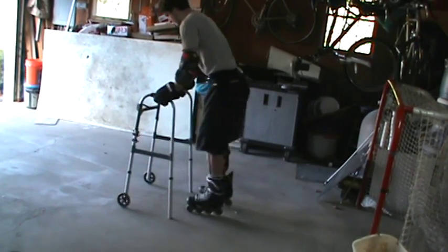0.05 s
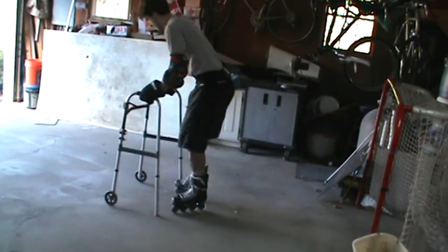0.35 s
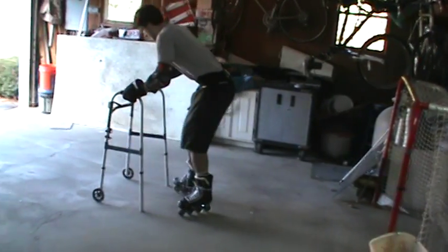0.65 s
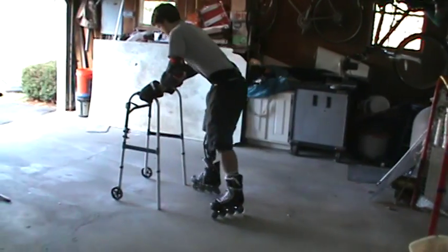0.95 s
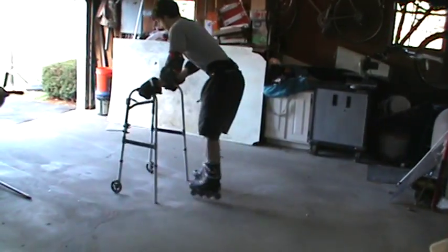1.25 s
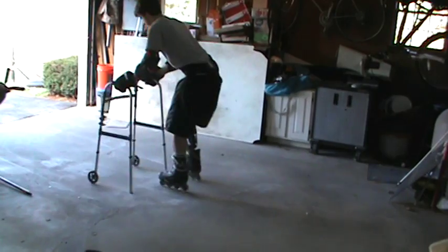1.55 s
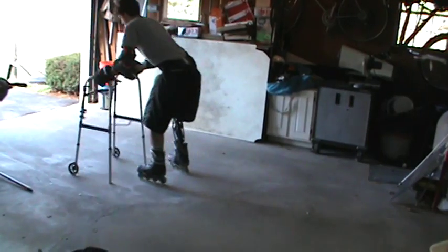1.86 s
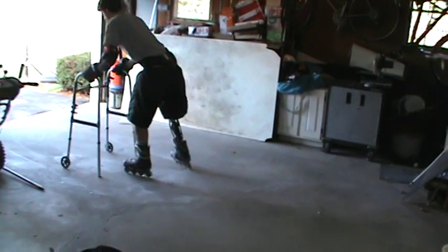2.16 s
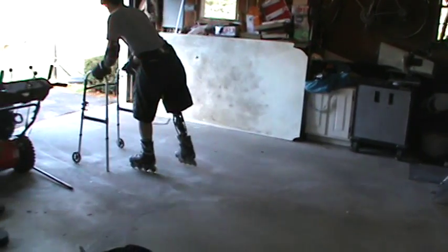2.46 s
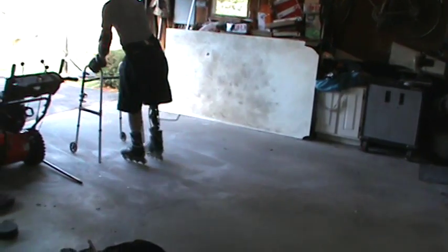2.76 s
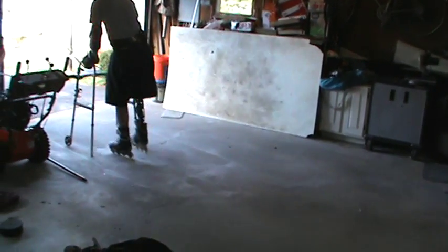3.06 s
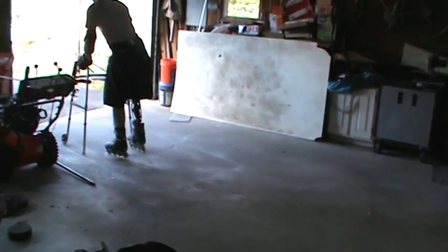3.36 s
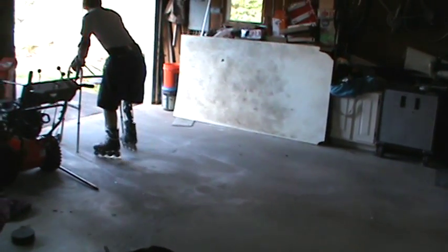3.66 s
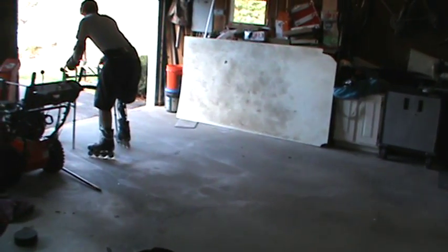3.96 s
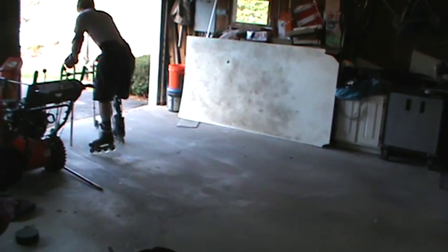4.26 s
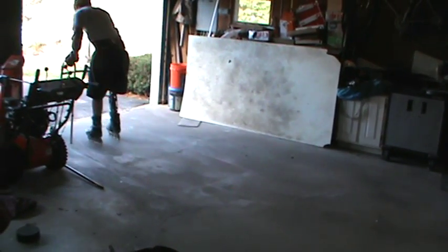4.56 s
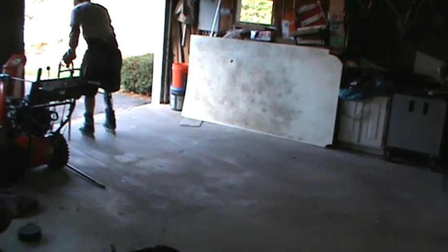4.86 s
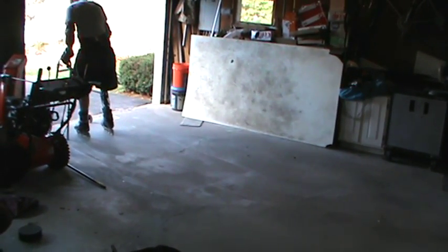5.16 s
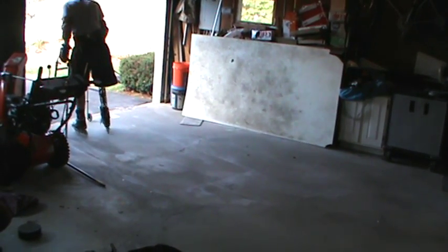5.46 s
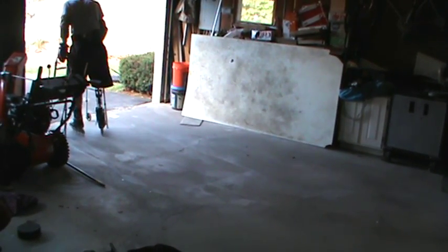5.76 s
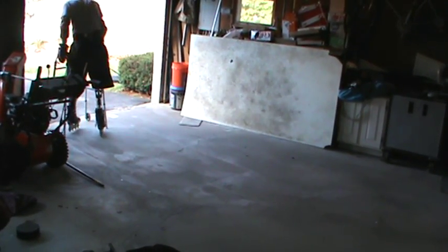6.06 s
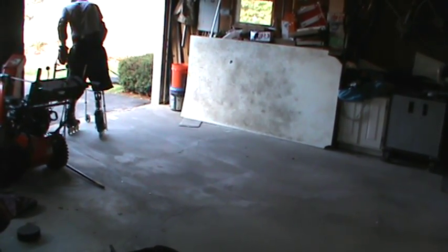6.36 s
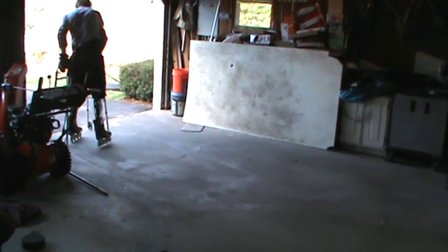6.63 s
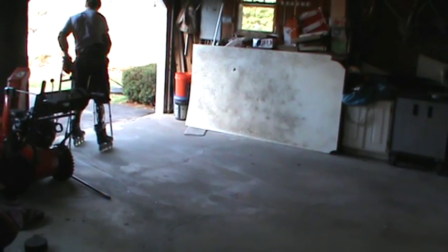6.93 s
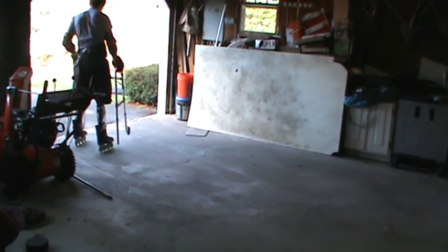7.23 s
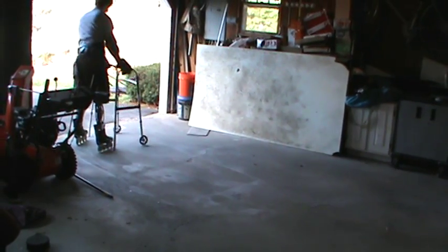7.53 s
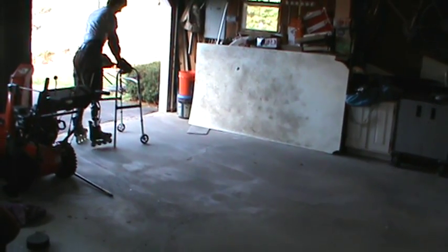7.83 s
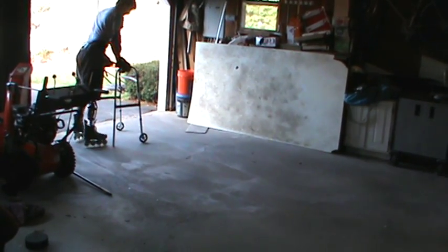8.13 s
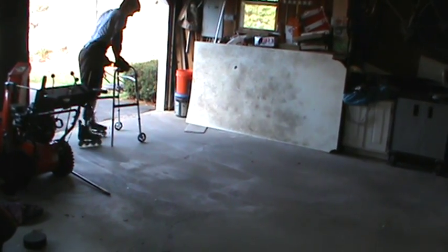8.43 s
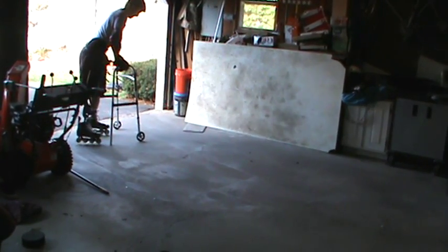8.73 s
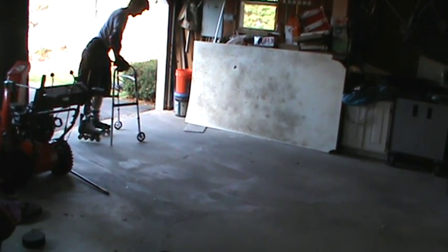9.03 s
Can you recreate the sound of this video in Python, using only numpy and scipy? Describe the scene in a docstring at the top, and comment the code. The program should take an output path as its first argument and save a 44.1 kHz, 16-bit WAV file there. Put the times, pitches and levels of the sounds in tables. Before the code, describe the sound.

An aluminium walker scrapes, squeals and clatters over a concrete garage floor while inline skates rumble and thud softly.

```python
"""First you hear an aluminium walker grinding and squealing over a concrete garage floor.
Someone on inline skates pushes it: its bare rear legs hop, stick and slip, ringing the tubes,
while its loose joints rattle and the skate wheels rumble and thud. The rolling stops at the open
door, where the walker is set down with a clatter. The garage echoes over faint outdoor air and hum."""
import sys
import numpy as np
from scipy import signal
from scipy.fft import rfft, irfft, next_fast_len
from scipy.io import wavfile
from scipy.ndimage import uniform_filter1d

SR = 44100
rng = np.random.default_rng(int(sys.argv[2]) if len(sys.argv) > 2 else 0)


def bounce(signal):
    """Save signal as a 16-bit WAV file at the path given by the first command-line argument."""
    frames = np.transpose(np.atleast_2d(signal))
    limited = np.clip(frames, -1, 1)
    pcm = np.round(limited * 32767).astype(np.int16)
    wavfile.write(sys.argv[1], SR, pcm)


N = 409688
TIME = np.arange(N) / SR
HIGHEST_HZ = 16000

# One loudness curve for each push of the walker: time_s, level_db, extra_low_ring_db
PUSHES = [
    [(0, -24.5, -1.5), (.1, -31, 1.5), (.25, -37.5, 0)],
    [(.3, -22.5, -4.5), (.39, -31, 2.5), (.52, -24, -2), (.64, -30, 0.5), (.79, -25.5, -2),
     (1.02, -30.5, -3), (1.28, -24.5, -3.5), (1.55, -28, -2.5), (2.14, -35, -3)],
    [(2.17, -26.5, 1), (2.45, -27.5, -1), (2.66, -25.5, -3.5), (2.8, -31, 1), (3.0, -27.5, -3.5),
     (3.2, -25, -4), (3.55, -23, -2), (3.86, -28, -1.5), (4.0, -32.5, -5.5)],
    [(4.03, -27.5, -6), (4.18, -31, -3.5), (4.33, -28, -2), (4.58, -33, -2), (4.81, -23, -2),
     (4.95, -31.5, -1.5), (5.21, -39, 8), (5.35, -52, -5)],
    [(5.4, -37, -4), (5.55, -34.5, -0.5), (5.73, -50, 2)],
]
# The tone of metal dragged on concrete: frequency_hz, gain_db
GRIND_TONE = [(100, -32), (300, -6), (520, -2.5), (950, -2), (1600, .5), (2400, -2.5), (3100, -4),
              (4500, -.5), (8000, -1.5), (11000, -1.5), (13000, -5), (16000, -12.5)]
def grinding_legs(gain_db=0.5, hops_per_s=110, dulling_db_per_s=0.5, treble_ceiling_db=-22.5):
    """The leg tips hop over the concrete and shake the frame; the shifting contact varies the tone."""
    force = grit(per_s=6000, spread_db=3) * amp(wander(N, hops_per_s))
    low, rest = split(walker_frame(force, GRIND_TONE, ring_db=0.5), 2800)
    middle, treble = split(rest, 7800)
    grind_gain, low_gain = sum(loudness_curves(push) for push in PUSHES)
    # The treble dulls as the walker moves away, and levels off in hard pushes.
    treble_gain = grind_gain * amp(-dulling_db_per_s * TIME)
    treble_gain /= np.hypot(1, treble_gain / amp(treble_ceiling_db))
    bands = [(low_gain, low), (grind_gain, middle), (treble_gain, treble)]
    return amp(gain_db) * sum(gain * unit_rms(band) * amp(0.95 * wander(N, 20)) for gain, band in bands)

# The notes at which the tubes ring: pitch_hz, width_hz, strength_db
TUBE_NOTES = [(568, 7.6, 12.5), (650.5, 36, 7), (761.8, 8.6, 11.5), (1235, 93, 7), (1394, 73, 7),
              (2140, 89, 0.5), (2280, 940, -1), (4154, 69, 9), (4385, 79, 7), (4790, 106, 4.5),
              (5730, 73, 2), (6200, 46, 8), (6850, 120, 2), (7330, 290, -2.5), (9700, 270, 1),
              (10200, 178, 3), (11770, 150, 6.5), (12600, 362, 0)]
def walker_frame(force, tone, ring_db):
    """The shaken frame gives a broad tone with the notes of its tubes standing out."""
    def gain_db(hz):
        peaks = sum(amp(db + ring_db) ** 2 / (1 + (2 * (hz - pitch_hz) / width_hz) ** 2)
                    for pitch_hz, width_hz, db in TUBE_NOTES)
        return curve_at(tone, hz) + 10 * np.log10(1 + peaks)
    return shape_tone(force, gain_db)

# A leg squeals: start_s, length_s, pitch_hz, level_db, waver_share (of the pitch)
SQUEALS = [(0, .24, 1283, -30, 0.057), (0, 0.29, 663, -33, 0.055), (0.568, 0.07, 710, -25.5, .03),
           (.87, 0.079, 4440, -23.5, 0.019), (1.035, 0.3, 1441, -27.5, 0.01),
           (1.224, 0.064, 4380, -25, 0.013), (3.31, .17, 4140, -28.5, 0.0024),
           (3.37, 0.41, 5150, -25.5, 0.028), (3.438, .26, 1278, -21.5, 0.024),
           (3.44, 0.15, 726, -26, 0.061), (3.44, .28, 6800, -27.5, 0.021), (3.746, 0.11, 4310, -23, 0.003),
           (4.228, 0.12, 1378, -25.5, 0.0079), (4.728, .23, 1415, -29.5, .005),
           (5.141, .1, 430.6, -29, .022)]
def squealing_legs(gain_db=-2, wavers_per_s=300, flutter_db=3, overtone_db_per_khz=-17):
    """A leg sticks and slips at one rough, wavering pitch; higher squeals are purer."""
    out = np.zeros(N)
    for start_s, length_s, hz, db, waver in SQUEALS:
        n = int(length_s * SR)
        phase = 2 * np.pi * np.cumsum(hz * (1 + waver * wander(n, wavers_per_s))) / SR
        tone = sum(amp(overtone_db_per_khz * k * hz / 1000) * np.sin((k + 1) * phase)
                   for k in range(5) if (k + 1) * hz < HIGHEST_HZ)
        squeal = unit_rms(tone * amp(flutter_db * wander(n, 89)))
        add(out, start_s, amp(db + gain_db) * squeal * signal.windows.tukey(n, 0.6))
    return out

# Knocks to the frame: start_s, level_db, extra_low_db, rattle_s
JOLTS = [(.41, -27.5, 8, 0.013), (.483, -18, -10, 0.0056), (.765, -30.5, 11.5, .015),
         (.92, -20.5, -19, 0.0084), (1.224, -19, -6, .008), (1.259, -21, -7, 0.0072),
         (2.991, -14.5, -1, 0.006), (3.84, -19.5, 0, .03), (4.051, -18.5, -11, 0.033),
         (4.991, -25, 8, 0.013), (5.386, -37, -2, 0.041), (6.095, -39.5, -2, 0.013), (6.182, -39, -8, .024),
         (6.896, -30, -1, .018), (6.925, -24.5, -3.5, 0.0097), (6.937, -26.5, -1.5, 0.0045),
         (7.063, -44, 7, 0.0049), (7.286, -35, -1, 0.0059), (7.295, -23.5, -0.5, .012),
         (7.309, -24.5, -2, 0.0065), (7.52, -18.5, -1, 0.013), (7.53, -12.5, -3, 0.027),
         (7.608, -10, -5, 0.023), (7.626, -15, -4, 0.036), (7.673, -14.5, 0.5, 0.035),
         (7.899, -22.5, -2.5, 0.0038), (7.908, -24.5, -5, 0.0037), (9.05, -41, -2, .05)]
# The tone of the clattering frame: frequency_hz, gain_db
CLATTER_TONE = [(60, -14), (130, -2), (250, -2), (600, -3), (950, 0), (1500, 3), (2000, 3.5), (2800, -.5),
                (5000, -1), (8000, 1.5), (11000, 1), (13000, -5), (16000, -17)]
def rattling_joints(gain_db=1, low_below_hz=2600):
    """Knocks rattle the loose joints; heavy ones carry more low ring."""
    highs, lows = np.zeros((2, N))
    for start_s, db, extra_low_db, rattle_s in JOLTS:
        knock = amp(db + gain_db) * rattle(rattle_s, first_hit=2.5, per_s=12000)
        add(highs, start_s, knock)
        add(lows, start_s, amp(extra_low_db) * knock)
    force = split(lows, low_below_hz)[0] + split(highs, low_below_hz)[1]
    return walker_frame(force, CLATTER_TONE, ring_db=-3)

# Small snaps of metal and grit: start_s, level_db, rattle_s
TICKS = [(.172, -29, .003), (.266, -12, 0.0038), (0.277, -12.5, .012), (1.26, -19, 0.011),
         (1.321, -21, .005), (1.438, -18, .006), (1.611, -16.5, 0.0044), (1.624, -19, .003),
         (2.057, -23, 0.0083), (2.098, -20.5, .006), (2.166, -12.5, 0.0076), (2.22, -17.5, 0.011),
         (2.304, -20, 0.0067), (2.397, -17.5, 0.018), (2.889, -19.5, 0.012), (2.99, -16, .003),
         (4.641, -25, .015), (6.47, -46.5, .002), (6.833, -35, 0.00081), (7.906, -19.5, 0.0049),
         (8.34, -57, .002)]
# Their bright tone: frequency_hz, gain_db
TICK_TONE = [(200, -54), (3500, -5), (6000, -3), (8000, 0.5), (9800, 7.5), (12000, 0), (16000, -9.5)]
def metal_ticks(gain_db=-1):
    """Light, hard taps ring only the highest notes of the tubes."""
    force = np.zeros(N)
    for start_s, db, rattle_s in TICKS:
        add(force, start_s, amp(db + gain_db) * rattle(rattle_s, first_hit=1.7))
    return walker_frame(force, TICK_TONE, ring_db=-3)

# The skates rumble until they stop at the door: time_s, level_db
ROLLING = [(0, -45), (2.0, -47.5), (3.0, -41), (3.25, -49), (3.6, -39), (4.0, -52.5), (4.8, -45),
           (5.4, -49.5), (6.2, -52), (6.6, -76)]
# A wheel scrubs at an angle: start_s, length_s, level_db
SCRUBS = [(.39, 0.34, -42.5), (2.18, 0.14, -35.5), (2.53, 0.28, -34), (2.97, 0.07, -37.5),
          (3.82, 0.097, -32)]
# The tone of the wheels: frequency_hz, gain_db
WHEEL_TONE = [(30, -46), (70, -19.5), (100, -0.5), (130, -2.5), (190, -9), (250, -11.5), (370, -3),
              (500, -8.5), (800, -7.5), (2000, -38)]
def rolling_wheels(drone_db=-3.5):
    """Wheels rumble on the rough floor; their hollow drone swells to a groan as they scrub."""
    rumble = loudness_curves(ROLLING)[0]
    drone = np.hypot(amp(drone_db) * rumble, swells(SCRUBS, rise_s=0.015, fall_s=0.034))
    sides = []
    for noise in rng.standard_normal((2, N)):
        deep, hollow = split(shape_tone(noise, lambda hz: curve_at(WHEEL_TONE, hz)), 244)
        sides.append(rumble * unit_rms(deep) + drone * unit_rms(hollow))
    return stereo(*sides)

# A skate lands: start_s, level_db, pitch_hz
THUDS = [(1.352, -16, 128), (1.385, -25, 150), (2.32, -32, 135), (4.31, -33, 92), (4.44, -33, 90),
         (4.55, -28, 110), (5.785, -39, 180), (6.25, -37, 125), (7.53, -34, 210), (7.63, -28, 115),
         (7.69, -34, 95), (9.15, -39, 140), (9.26, -36, 116)]
def skate_thuds(rise_s=0.002, fade_60db_s=0.26):
    """A heavy landing makes a low note with an overtone that dies twice as fast."""
    out, t = np.zeros(N), np.arange(SR // 2) / SR
    fade = amp(-60 * t / fade_60db_s)
    for start_s, db, hz in THUDS:
        ring = np.sin(2 * np.pi * hz * t) + 0.5 * fade * np.sin(2 * np.pi * hz * 1.8 * t)
        add(out, start_s, amp(db) * fade * (1 - np.exp(-t / rise_s)) * ring)
    return out

# Wheels hit the floor: start_s, level_db
CLACKS = [(5.517, -24.5), (5.527, -29), (5.536, -29), (6.729, -41), (6.75, -41.5), (7.985, -38)]
# The tone of a clack: frequency_hz, gain_db
CLACK_TONE = [(100, -10), (450, -17), (620, -1.5), (800, -6.5), (1000, -8), (1350, -11), (1900, -20),
              (5000, -24), (16000, -52)]
def wheel_clacks():
    """Hard wheels come down sideways on the concrete with one sharp hit and a tiny rattle."""
    force = np.zeros(N)
    for start_s, db in CLACKS:
        add(force, start_s, amp(db) * rattle(rattle_s=0.0015, first_hit=5.7))
    return shape_tone(force, lambda hz: curve_at(CLACK_TONE, hz))

# Faint shuffles on the spot: start_s, length_s, level_db
SHUFFLES = [(5.85, 0.078, -46.5), (6.8, 0.13, -39), (8.3, 0.022, -46), (8.52, 0.031, -45.5),
            (8.7, 0.082, -50), (9.0, 0.13, -46), (9.25, 0.06, -49)]
def shuffling(fidget_db=-60.5):
    """Loose grit crunches under small movements, and faintly all the while."""
    movement = amp(fidget_db) + swells(SHUFFLES, rise_s=0.018, fall_s=0.0083)
    return movement * walker_frame(grit(per_s=5100, spread_db=4), CLATTER_TONE, ring_db=-6)

# How long the garage echoes: frequency_hz, fade_60db_s
ECHO_TIMES = [(100, 0.15), (500, 0.33), (2000, 0.58), (6000, 0.44), (10000, 0.28), (16000, 0.34)]
def echoes(early_db=-6, tail_db=-5, early_fade_s=0.012, build_s=0.007):
    """One spot's echo: quick bounces off floor and clutter, then a smooth tail."""
    n = SR * 3 // 4
    t = np.arange(n) / SR
    hz, time_s, spectrum = signal.stft(rng.standard_normal((2, n)), SR, nperseg=256)
    spectrum *= amp(-60 * time_s / curve_at(ECHO_TIMES, hz)[:, None])
    tail = signal.istft(spectrum, SR, nperseg=256)[1][:, :n] * (1 - np.exp(-t / build_s))
    early = rng.standard_normal((2, n)) * (rng.random((2, n)) < 3000 / SR) * np.exp(-t / early_fade_s)
    return stereo(*sum(amp(db) * part / np.linalg.norm(part, axis=1, keepdims=True)
                       for db, part in [(early_db, early), (tail_db, tail)]))

def garage(sound, direct_db=-7, turn_samples=1024, spots=8):
    """Legs and wheels touch ever different spots, and each spot has its own echo."""
    out = amp(direct_db) * np.array([sound, sound])
    turn = np.pad(signal.windows.cosine(turn_samples), (0, (spots - 2) * turn_samples // 2))
    for spot in range(spots):
        share = np.resize(np.roll(turn, spot * turn_samples // 2), N)  # spots take turns at even power
        out += signal.oaconvolve((sound * share)[None], echoes(), axes=1)[:, :N]
    return out

# The tone of the air and hiss: frequency_hz, gain_db
AIR_TONE = [(12, -40), (20, -20), (60, -7.5), (130, -0.5), (228, -12), (301, -12), (367, -6), (446, -12.5),
            (542, -6), (738, -9), (1860, -23.5), (5530, -28.5), (10500, -28), (12800, -33), (16000, -30.5)]
def background(air_db=-45, hum_hz=120, hum_db=-52):
    """Outdoor air comes through the open door, with a soft hiss and a wavering hum."""
    noises = rng.standard_normal((2, N))
    air = stereo(*[shape_tone(noise, lambda hz: curve_at(AIR_TONE, hz)) for noise in noises])
    hum = np.sin(2 * np.pi * np.cumsum(hum_hz + 3 * wander(N, 15)) / SR)
    hum *= amp(2.1 * wander(N, 7.2))
    return amp(air_db) * unit_rms(air) + amp(hum_db) * unit_rms(hum)

# How alike left and right are: frequency_hz, likeness (0 to 1)
LIKENESS = [(100, .94), (300, .89), (1000, .74), (2000, .58), (4000, .52), (8000, .66), (14000, .5)]
def stereo(a, b):
    """Two unrelated signals become the left and right of a sound that comes from all around."""
    n = next_fast_len(len(a), True)
    likeness = np.clip(curve_at(LIKENESS, np.fft.rfftfreq(n, 1 / SR)), 0, 1)
    mid = rfft(a, n) * np.sqrt((1 + likeness) / 2)
    side = rfft(b, n) * np.sqrt((1 - likeness) / 2)
    return irfft(np.array([mid + side, mid - side]), n)[:, :len(a)]

def grit(per_s, spread_db):
    """Tiny hits on sand grains: many small, a few large."""
    size = amp(spread_db * np.minimum(rng.exponential(1, N), 3.5))
    return unit_rms(size * rng.choice([-1, 1], N) * (rng.random(N) < per_s / SR))

def rattle(rattle_s, first_hit, per_s=1500, n=6000):
    """One hit and a dying shower of bounces, with the energy of 20 ms at level one."""
    t = np.arange(n) / SR
    shower = rng.standard_normal(n) * (rng.random(n) < per_s / SR) * np.exp(-t / rattle_s)
    shower[0] = first_hit
    return shower / np.linalg.norm(shower) * np.sqrt(SR / 50)

def swells(rows, rise_s, fall_s):
    """The loudness of short movements: each rises, holds and dies away."""
    gain, t = np.zeros(N), np.arange(SR) / SR
    for start_s, length_s, db in rows:
        fade = np.exp(-np.maximum(t - length_s, 0) / fall_s)
        add(gain, start_s, amp(db) * np.minimum(t / rise_s, 1) * fade)
    return gain

def loudness_curves(rows, fade_s=0.026):
    """One curve for the level and one for each extra added to it; both ends fade to silence."""
    times, level_db, *extras = np.transpose(rows)
    gate = np.interp(TIME, [times[0] - fade_s, times[0], times[-1], times[-1] + fade_s], [0, 1, 1, 0])
    return np.array([gate * amp(np.interp(TIME, times, level_db + extra)) for extra in [0] + extras])

def shape_tone(x, gain_db, size=4096):
    """Filters x to the shape gain_db(hz), ringing only after each hit; white noise keeps its level."""
    log_gain = np.log(amp(gain_db(abs(np.fft.fftfreq(size, 1 / SR)))))
    response = np.fft.ifft(np.exp(np.conj(signal.hilbert(log_gain)))).real
    return signal.oaconvolve(x, response / np.linalg.norm(response))[:N]

def split(x, hz):
    """The parts of x below and above a frequency."""
    n = next_fast_len(N, True)
    low = irfft(rfft(x, n) / (1 + (np.fft.rfftfreq(n, 1 / SR) / hz) ** 8), n)[:N]
    return low, x - low

def curve_at(points, hz):
    """Reads between a table's points on a log-frequency scale."""
    frequencies, values = np.transpose(points)
    return np.interp(np.log(hz + 1), np.log(frequencies + 1), values)

def wander(n, per_s):
    """A random drift of about size one that turns per_s times a second."""
    points = rng.standard_normal(4096)
    return np.interp(np.arange(n) * per_s / SR, np.arange(len(points)), points)

def add(mix, start_s, sound):
    """Mixes a sound in at start_s."""
    part = mix[round(start_s * SR):][:len(sound)]
    part += sound[:len(part)]

def amp(db):
    """Turns decibels into a multiplier."""
    return 10 ** (np.asarray(db) / 20)

def unit_rms(x):
    """Scales x to an average (rms) level of one."""
    return x / np.sqrt(np.mean(x ** 2) + 1e-20)

def scene():
    """The walker and the clacks echo in the garage; rumble, thuds and background arrive directly."""
    skates = rolling_wheels() + skate_thuds()
    clacks = wheel_clacks()
    walker = grinding_legs() + squealing_legs() + rattling_joints() + metal_ticks() + shuffling()
    return garage(walker + clacks) + skates + background()

def record(dry):
    """A fast limiter turns everything down briefly at sharp peaks; then the highest treble is cut."""
    limit_db, recover_db_per_s = -6, 200
    peak_db = 20 * np.log10(abs(dry).max(axis=0) + 1e-9)
    recovery_db = TIME * recover_db_per_s
    held_peak_db = np.maximum.accumulate(peak_db + recovery_db) - recovery_db
    over_db = np.maximum(held_peak_db - limit_db, 0)
    limited = dry / amp(uniform_filter1d(over_db, size=30))
    lowpass = signal.firwin(511, HIGHEST_HZ, window=("kaiser", 9), fs=SR)
    return signal.oaconvolve(limited, lowpass[None], "same")

dry = scene()
out = record(dry)
bounce(out)
```